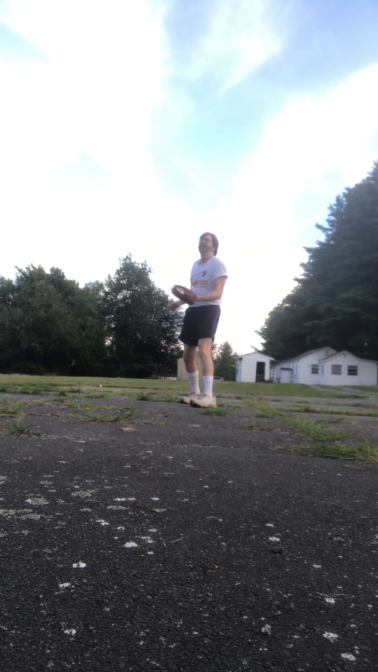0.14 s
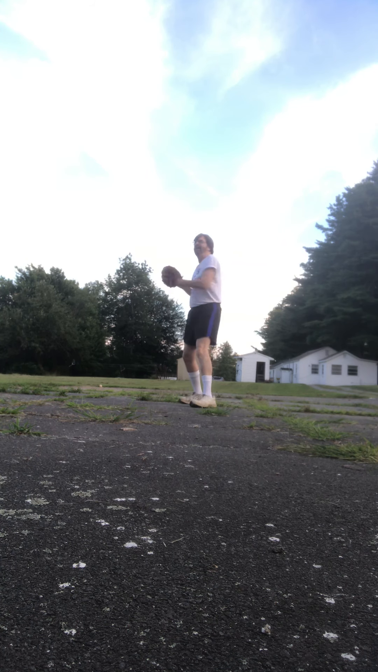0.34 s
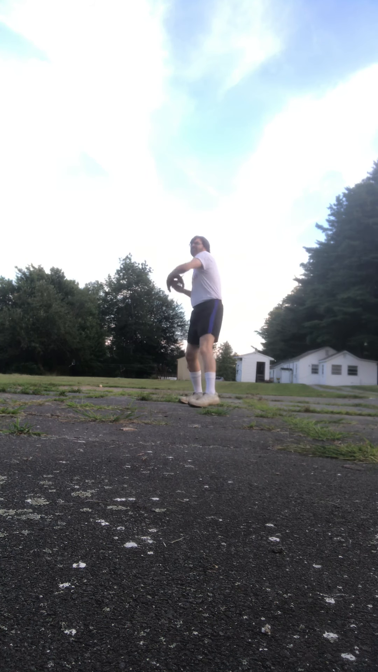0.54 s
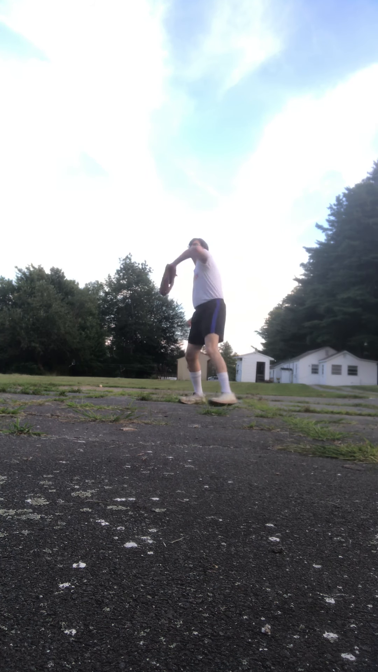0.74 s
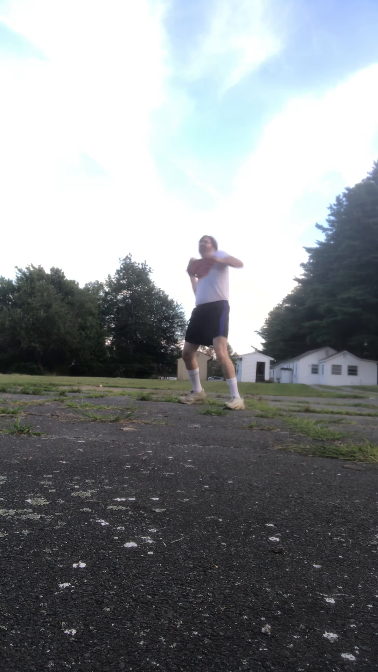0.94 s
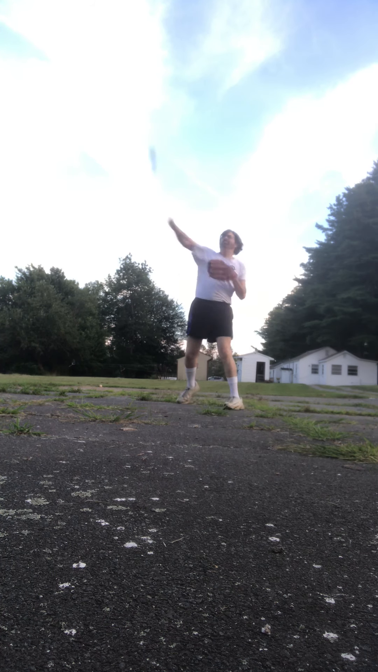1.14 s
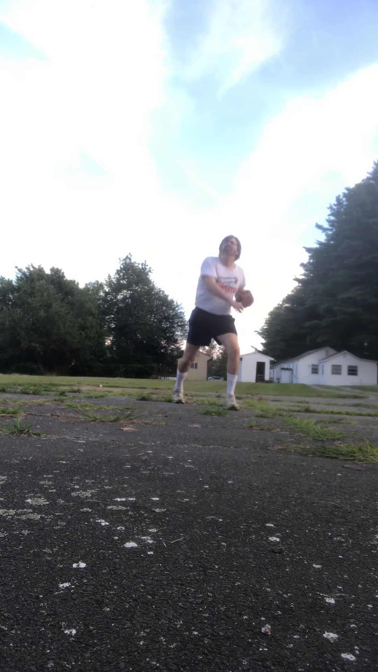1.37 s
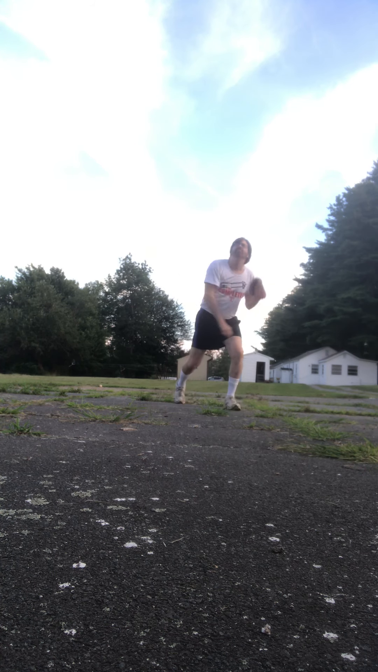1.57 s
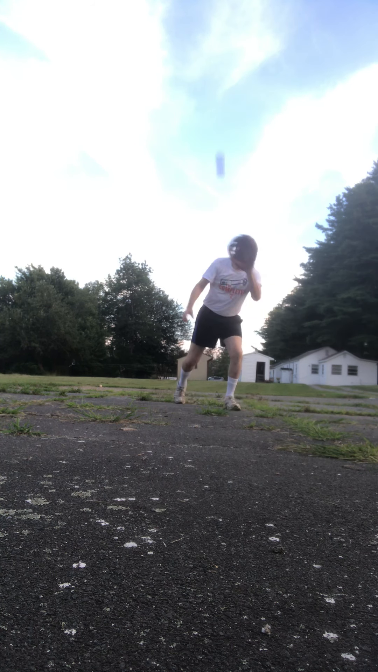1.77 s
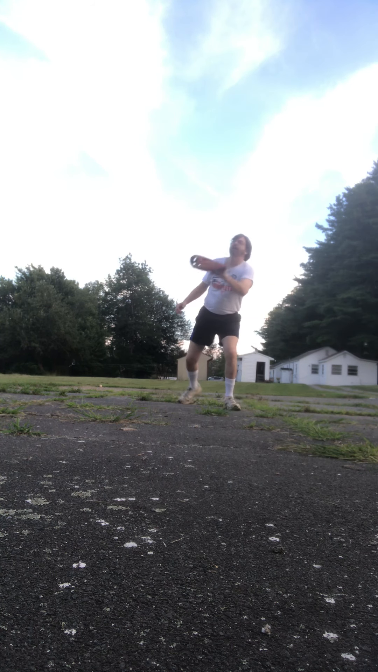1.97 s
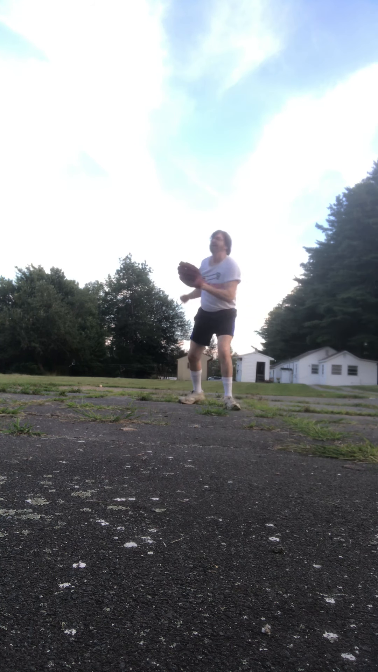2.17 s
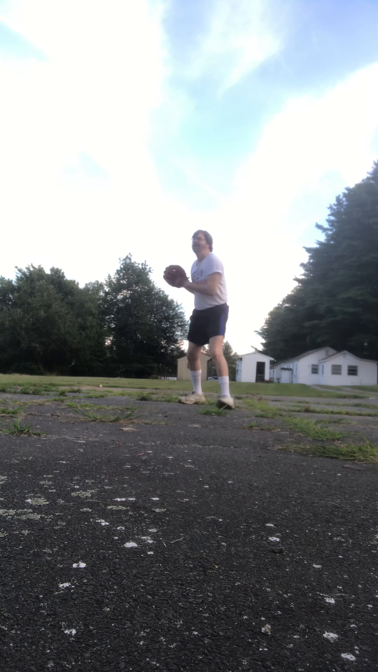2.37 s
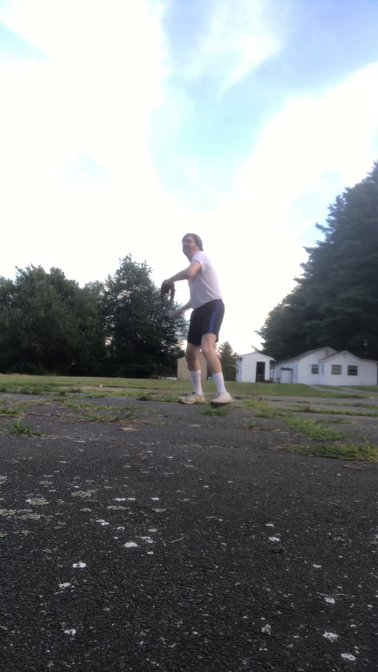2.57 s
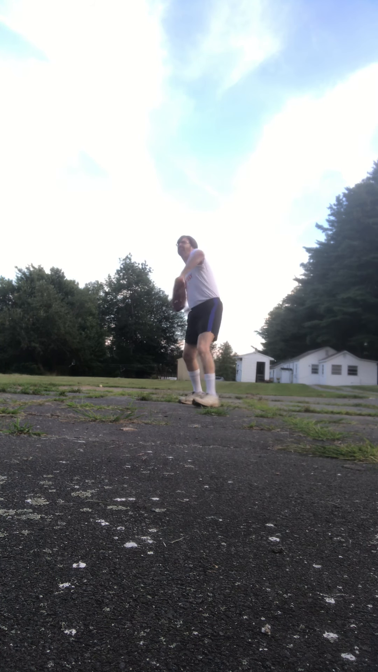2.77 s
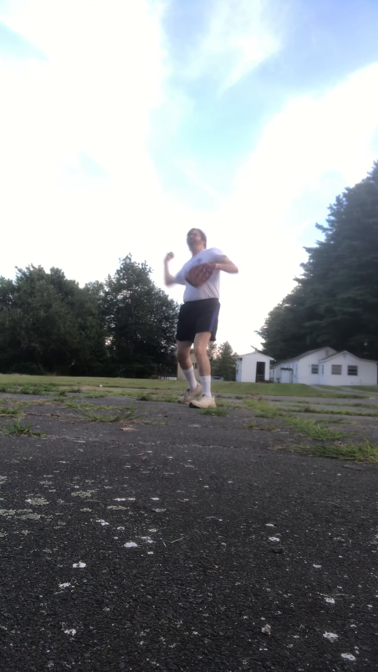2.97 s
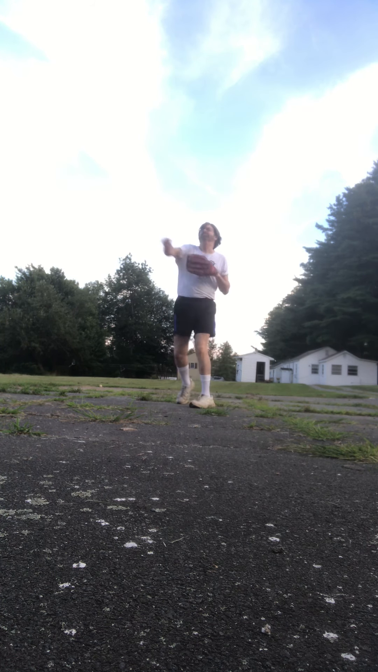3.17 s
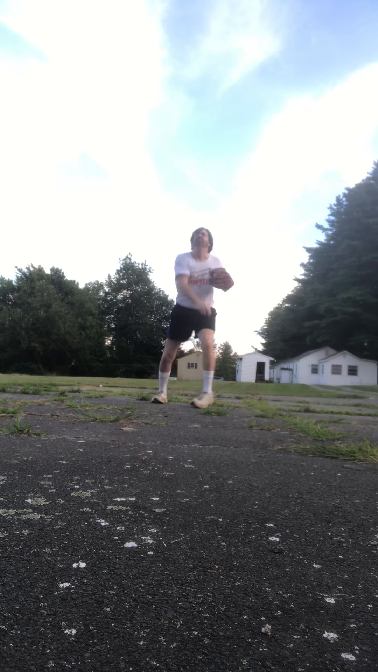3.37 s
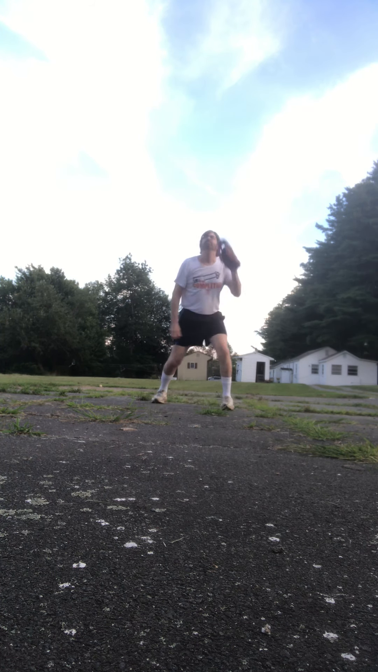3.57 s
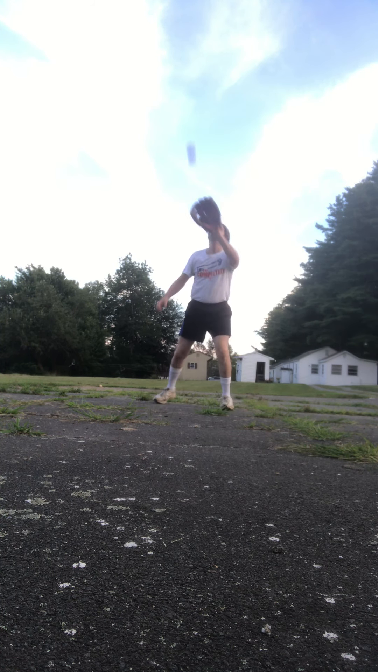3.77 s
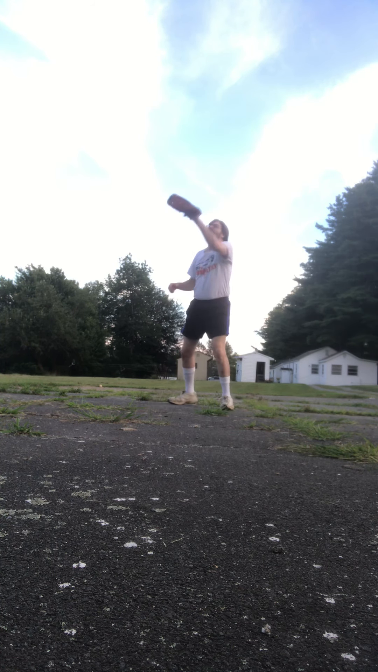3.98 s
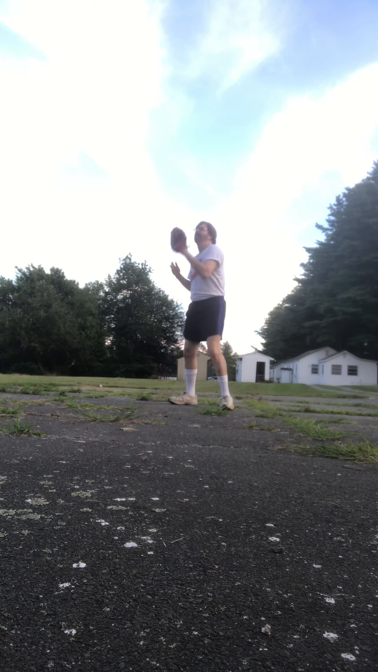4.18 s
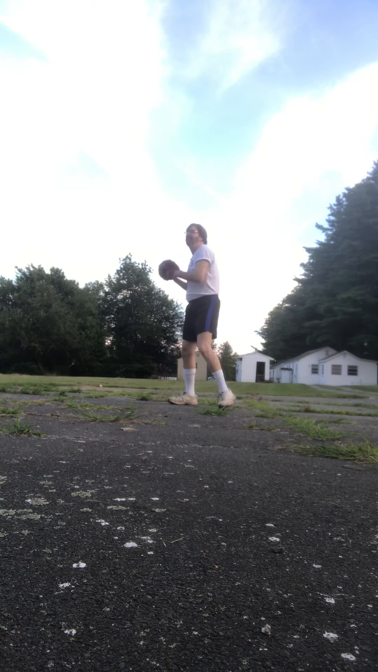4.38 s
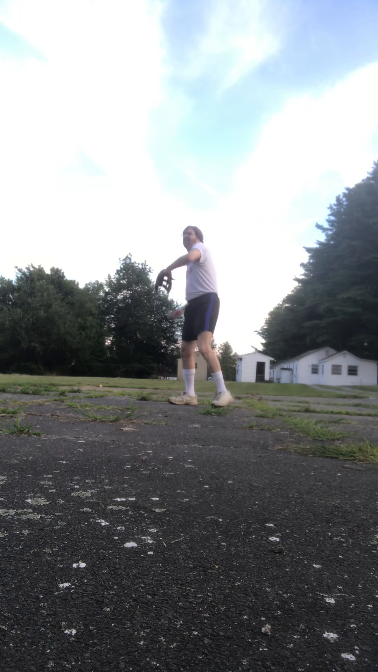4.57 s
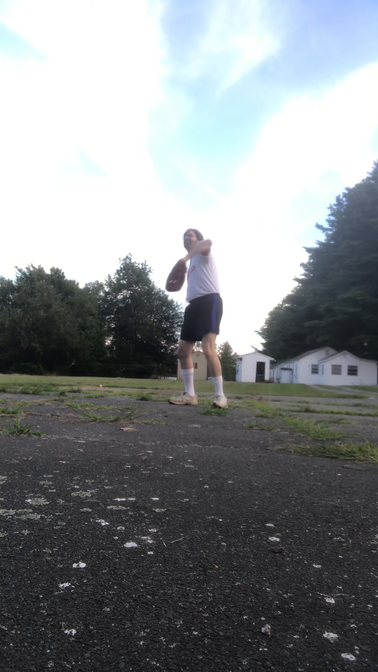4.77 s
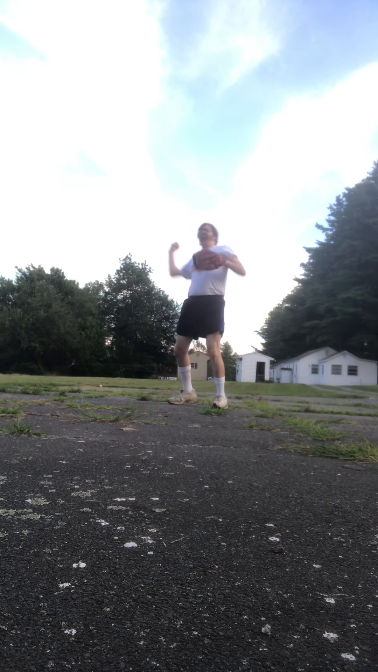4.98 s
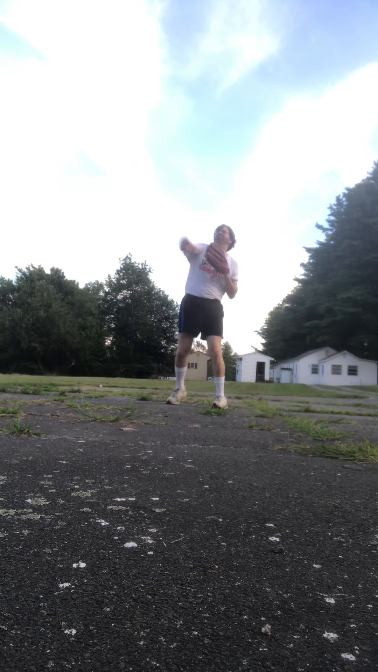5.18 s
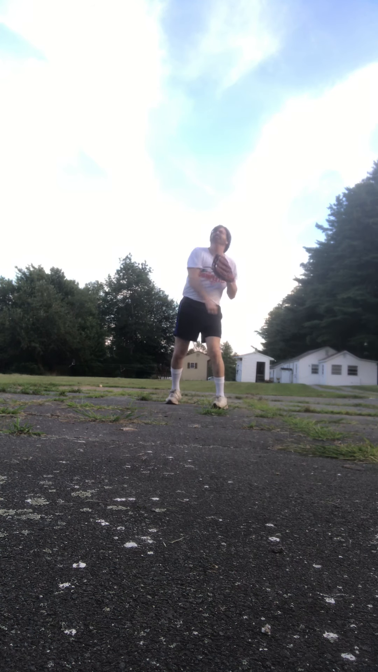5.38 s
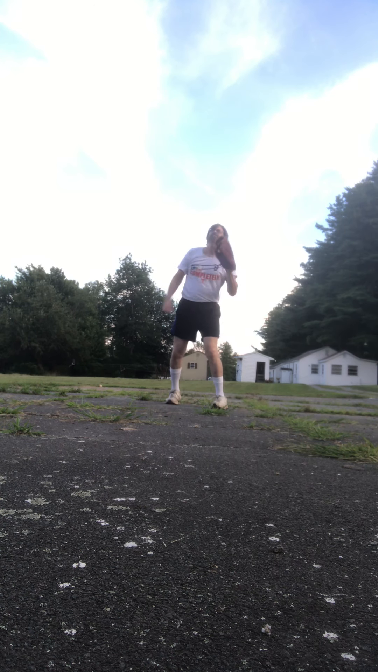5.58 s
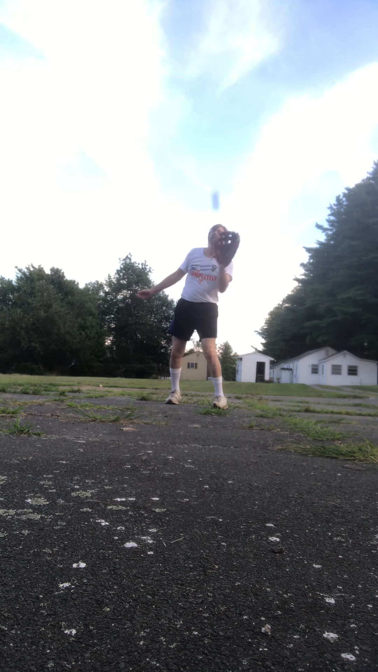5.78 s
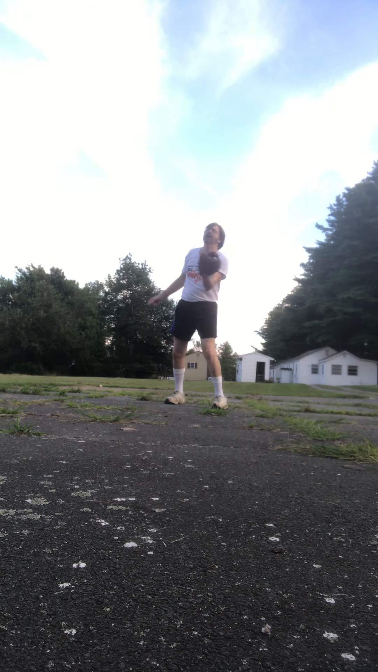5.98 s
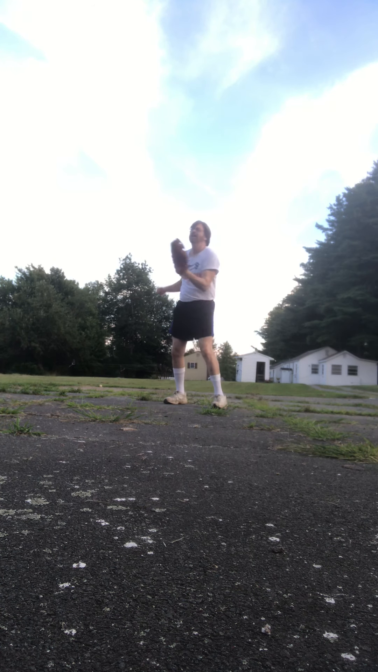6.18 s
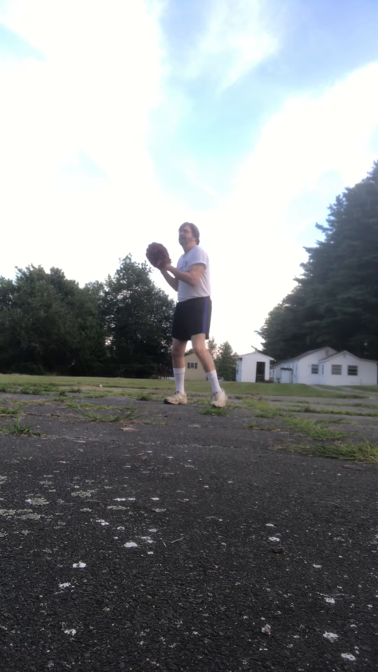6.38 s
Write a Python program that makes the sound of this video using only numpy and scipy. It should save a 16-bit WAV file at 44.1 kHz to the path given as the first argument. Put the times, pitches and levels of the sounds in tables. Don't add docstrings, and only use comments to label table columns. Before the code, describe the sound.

A quiet open asphalt yard with faint distant traffic hum, a thin cricket and tiny bird chips. Three times, about two seconds apart, a ball hits a hollow panel close to the microphone: a sharp, choked crack with a low boom and faint echoes from sheds and trees. Half a second later a lighter leather smack marks each catch. Shoes scuff and crunch grit between throws.

```python
import sys
import numpy as np
from scipy import signal
from scipy.io import wavfile

SR = 44100
rng = np.random.default_rng(int(sys.argv[2]) if len(sys.argv) > 2 else 0)


def unload_wav(signal):
    wavfile.write(
        sys.argv[1],
        SR,
        np.round(np.clip(np.atleast_2d(signal).T, -1, 1) * 32767).astype(np.int16),
    )


def voltage_ratio(decibels):
    exponent = np.asarray(decibels, float) / 20
    return 10 ** exponent


N = 283563


def rms_one(x):
    return x / np.sqrt(np.mean(x ** 2) + 1e-20)


def peak_one(x):
    return x / np.max(np.abs(x))


def band(x, lo_hz, hi_hz):
    edges = [max(lo_hz, 10), min(hi_hz, .45 * SR)]
    return signal.sosfilt(signal.butter(2, edges, "band", fs=SR, output="sos"), x)


def resonance(x, hz, width_hz):
    r = np.exp(-np.pi * width_hz / SR)
    return signal.lfilter([(1 - r * r) / 2, 0, (r * r - 1) / 2],
                          [1, -2 * r * np.cos(2 * np.pi * hz / SR), r * r], x)


def body(force, peaks):
    return sum((-1) ** k * voltage_ratio(db) * resonance(force, hz, width) for k, (hz, width, db) in enumerate(peaks))


def fade(t60, seconds):
    return voltage_ratio(-60 * np.arange(int(seconds * SR)) / SR / max(t60, 1e-4))


def add(track, s, sound):
    i = max(round(s * SR), 0)
    track[i:i + len(sound)] += sound[:N - i]


def drift(rate):
    r = np.exp(-80 * np.pi * rate / SR)
    slow = signal.lfilter([1], [1, -2 * r, r * r], rng.standard_normal(N // 40 + 2002))[2000:]
    return np.interp(np.arange(N) / 40, np.arange(len(slow)), rms_one(slow))


def rush(peaks, db, seconds, top_hz, slope=0.95):
    swell = np.linspace(0, 1, int(seconds * SR)) ** slope
    hiss = body(rng.standard_normal(len(swell)), peaks)
    hiss = band(band(hiss, 360, top_hz), 200, 2.1 * top_hz)
    return voltage_ratio(db) * swell * rms_one(hiss)


# pitch_hz [Hz], level_db [dB per Hz]
AIR_SPECTRUM = [(90, -8), (130, -11), (250, -15.5), (500, -23), (1200, -24.5), (2000, -31), (2800, -35.5),
                (4000, -38.5), (7000, -40.5), (9000, -46.5), (10500, -49.5), (12500, -46.5), (15500, -54)]
# pitch_hz [Hz], width_hz [Hz], level_db [dB rms]
HUMS = [
    (33.97, 19.5, -69.5),
    (56.55, 9, -53.5),
    (71, 21, -53),
    (145.5, 7.9, -57.5),
    (349.6, 14, -67.5),
    (5554, 600, -72),
]


def yard():
    white = rng.standard_normal((2, N + SR))
    edges = 90 * 2 ** np.arange(0, 7.7, 1 / 3)
    hz, db = np.transpose(AIR_SPECTRUM)
    air, together = 0, drift(0.5)
    for k, (low, high) in enumerate(zip(edges, edges[1:])):
        level_db = np.interp(np.log(low * high) / 2, np.log(hz), db)
        gain = voltage_ratio(level_db + .8 * together + .9 * drift(8))
        air = air + gain * band(white[k % 2], low, high)[SR:]
    out = voltage_ratio(-57.5) * air / np.std(band(air, 190.0, 16000))
    motor_hz = 347.7 + 1.46 * drift(4.53)
    out += voltage_ratio(-61 + 0.46 * drift(2.3)) * np.sin(2 * np.pi * np.cumsum(motor_hz) / SR)
    for hz, width, db in HUMS:
        noise = rng.standard_normal(N + SR)
        hum = resonance(resonance(noise, hz, width), hz, 1.4 * width)
        out += voltage_ratio(db) * rms_one(hum[SR:])
    return out


# start_s [s], level_db [peak dB], pitch_hz [Hz]
BIRD_CHIPS = [(0.159, -53, 5120), (0.765, -55, 5240), (0.9926, -65, 4760), (1.643, -60, 5010),
              (2.07, -61, 4800), (2.4244, -56.5, 5080), (2.532, -65, 4580), (3.639, -60, 4900),
              (3.765, -60, 4800), (4.563, -59, 5150), (4.6844, -69, 4500), (5.128, -63, 5020)]


def birds():
    out, u = np.zeros(N), np.linspace(0, 1, int(.018 * SR))
    for s, db, hz in BIRD_CHIPS:
        pitch = hz * (.92 + .1 * np.sin(np.pi * u))
        add(out, s, voltage_ratio(db) * np.hanning(len(u)) * np.sin(2 * np.pi * np.cumsum(pitch) / SR))
    return out


CRICKET_STARTS = [0, .39, .81, 1.27, 1.715, 2.172, 2.6, 3.025, 3.57, 4.1, 4.59, 5.0, 5.425, 5.87, 6.29]


def cricket():
    out, u = np.zeros(N), np.linspace(0, 1, int(.12 * SR))
    pitch = 8000 * (.955 + .065 * np.sin(np.pi * u) ** .6 - .025 * u)
    for s in CRICKET_STARTS:
        throb = rms_one(band(rng.standard_normal(len(u)), 10, 105)) + 1.1
        add(out, s, voltage_ratio(-79) * np.hanning(len(u)) ** 0.28 * throb * np.sin(2 * np.pi * np.cumsum(pitch) / SR))
    return out


# start_s [s], length_s [s], level_db [dB], low_db and high_db [dB re middle range]
SCUFFS = [(0.164, 0.092, -67.5, 4, -3), (0.22, 0.1, -66, -6, -8), (0.483, 0.053, -66, -9, -31),
          (0.84, 0.054, -65.5, 11.5, -3), (1.056, 0.12, -69.5, 13.5, -2), (1.266, 0.25, -60.5, 0.5, -14.5),
          (1.278, 0.1, -65.5, 6.5, -16), (1.375, 0.076, -57, 8, -5), (2.286, 0.064, -57.5, 5.5, -14),
          (2.322, 0.12, -61.5, -6, -18), (2.326, 0.069, -57.5, -1.5, -14), (3.075, 0.084, -56.5, 10, 2.5),
          (3.189, 0.058, -56.5, 2.5, -4), (3.221, 0.047, -54, -23, -6.5), (3.304, 0.087, -53.5, 5, -9),
          (3.328, 0.042, -51, 8, -14), (3.412, 0.033, -48, -3, 3), (3.483, 0.07, -55.5, 7.5, -22),
          (3.933, 0.09, -59, 1.5, -12), (4.162, 0.091, -65.5, 6.5, -28), (4.488, 0.068, -61.5, 15, 0),
          (4.568, 0.1, -62.5, 6, -1.5), (5.954, 0.086, -65, -9, -26)]


def scuffs():
    attack_s, release_s = 0.017, 0.027
    grains = rng.standard_normal(N) * voltage_ratio(2 * rng.exponential(1, N))
    grains *= (rng.random(N) < 9000 / SR) * voltage_ratio(1.5 * drift(80))
    low, mid, high = (rms_one(band(grains, *edges)) for edges in [(350, 1500), (1500, 5000), (5000, 8200)])
    high = high + voltage_ratio(-5.0) * rms_one(band(grains, 8500, 17000))
    out, grip = np.zeros(N), voltage_ratio(1.5 * drift(30))
    for s, length, db, low_db, high_db in SCUFFS:
        i = np.arange(round(s * SR), round((s + length) * SR))
        t = i / SR - s
        shape = np.clip(np.minimum(t / attack_s, (length - t) / release_s), 0, 1) ** 2
        grit = mid[i] - voltage_ratio(low_db) * low[i] - voltage_ratio(high_db) * high[i]
        out[i] += voltage_ratio(db) * shape * rms_one(grip[i]) * grit
    return out


# start_s [s], level_db [peak dB], low_db, middle_db, high_db [dB of each ring]
CRUSHED_STONES = [(1.075, -32, -12, -16, -14), (1.303, -31, -12, -11, -18), (1.337, -34, -22, -13, -8),
                  (3.088, -34, -14, -10, -13), (3.117, -30, -20, -23, -5), (3.123, -30, -4, -18, -15),
                  (3.204, -42, -12, -15, -11), (3.328, -33, -10, -11, -19), (3.344, -28.5, -15, -9, -22),
                  (3.348, -23, -19, -0.5, -20), (3.353, -38, 8, 5, -12), (3.986, -33, -20, -7, -9),
                  (3.982, -34, -9.5, -12, -22), (4.057, -38, -18, -4, -20), (4.298, -35, -18, -5.5, -16),
                  (4.017, -33, -20, -5, -14), (4.166, -36, -13, -5, -23), (4.183, -35, -8, -5, -21),
                  (4.192, -31.5, -20, -7, -20), (4.212, -34, -9, -6.5, -30),
                  (4.482, -24.5, -11.5, -12, -10), (4.497, -35, -3, -19, -25), (4.504, -32, -3, -11, -15),
                  (4.513, -26.5, -7, -5.5, -10), (4.521, -28.5, -13, -8, -10), (4.526, -28, -15, -10, -5),
                  (4.534, -25.5, -5.5, -11, -13), (4.546, -39, -9, -8, -13), (4.581, -41, -9, -5, -9),
                  (4.592, -41, -19, -5, -15), (4.597, -45, -12, -10, -13), (4.605, -32, -11, -7, -17),
                  (4.611, -28, -22, -9, -10), (4.62, -29, -29, -7, -6), (4.633, -38, -25, -6, -11),
                  (4.649, -38, -25, -4, -20)]
# pitch_hz [Hz], width_hz [Hz]
SOLE_RINGS = [
    (1050, 280),
    (2400, 720),
    (6200, 1700),
]


def crunch():
    out, n = np.zeros(N), SR // 30
    for s, db, *ring_db in CRUSHED_STONES:
        burst = rng.standard_normal(n) * fade(0.0089, 1)[:n]
        rings = sum(voltage_ratio(g) * peak_one(resonance(resonance(burst, hz, w), hz, 2 * w))
                    for g, (hz, w) in zip(ring_db, SOLE_RINGS))
        add(out, s, voltage_ratio(db - 4.5) * rings)
    return out


# start_s [s], level_db [peak dB], pitch_hz [Hz],
# t60_s [s]
KNOCKS = [(1.104, -32.5, 656, 0.011), (1.397, -35, 424, 0.031), (1.43, -30, 280, .06),
          (1.407, -37.5, 568, 0.054), (3.388, -27, 633, 0.027), (5.385, -32, 760, 0.024),
          (2.849, -40.5, 231, 0.03), (1.926, -23.5, 374, 0.015), (2.087, -45.5, 386, 0.037),
          (3.097, -36, 605, 0.021), (3.109, -33.5, 870, 0.021), (3.119, -36, 560, 0.021),
          (4.518, -43, 666, 0.029), (3.129, -38.5, 835, 0.021), (3.343, -38.5, 249, 0.079),
          (3.498, -17, 452, 0.01), (3.603, -41.5, 195, 0.084), (3.917, -28.5, 202, 0.02),
          (5.899, -33, 680, 0.02)]


def knocks():
    out, t = np.zeros(N), np.arange(SR // 20) / SR
    for s, db, hz, t60 in KNOCKS:
        onset = 1 - np.exp(-t / 0.0014)
        add(out, s, voltage_ratio(db + 6.5) * onset * np.sin(2 * np.pi * hz * t) * fade(t60, .05))
    return out


# start_s [s], level_db [peak dB], pitch_hz [Hz], scratch_db [dB]
LEATHER_TICKS = [(0.187, -53, 1750, -21), (0.247, -49, 1290, -19), (0.299, -46, 1210, -29),
                 (1.1454, -46, 1570, -16.5), (1.315, -40.5, 2250, -18), (1.9263, -36.5, 1660, -13),
                 (1.9038, -35, 7450, -30), (1.918, -41, 3300, -25), (5.883, -38, 2200, -25),
                 (2.3086, -36.5, 1250, -13.5), (2.377, -52, 1800, -2), (2.582, -48, 1300, -11),
                 (2.891, -50.5, 1310, -8.5), (3.9145, -41, 1800, -14), (3.899, -33, 1300, -16),
                 (3.893, -36, 1800, -18), (4.3313, -60, 1808, -2), (5.662, -53, 1070, -12),
                 (5.98, -55, 1210, -18), (5.995, -54, 1900, -21), (5.077, -43, 1260, -38),
                 (5.1494, -58, 1450, 1), (5.259, -51.5, 4700, -11), (5.948, -51, 1525, -8),
                 (5.971, -47, 1850, -30), (6.167, -46.5, 1315, -37), (3.499, -34, 1540, -26)]
# start_s [s], level_db [peak dB], pitch_hz [Hz], scratch_db [dB]
LACE_TICKS = [(0.4888, -50, 2320, -23), (1.276, -43, 1450, -18), (2.8374, -32.5, 2080, -29),
              (3.279, -37.5, 1240, -21), (3.5224, -34.5, 2900, -44), (3.966, -43.5, 2250, -19),
              (4.058, -46, 1730, -14.5), (4.301, -48.5, 1647, -38), (4.84, -44, 1480, -27),
              (4.212, -48, 2350, -36), (5.979, -55, 1260, -32), (6.01, -54, 1650, -36)]
# start_s [s], level_db [peak dB], pitch_hz [Hz], scratch_db [dB]
STONE_TICKS = [(2.009, -53, 1270, -20), (2.2937, -42.5, 3320, -20), (2.366, -42, 5100, 1),
               (2.6289, -45, 1600, -9.5), (3.3138, -43, 1290, -11), (0.187, -52, 3000, -10),
               (0.2275, -56, 8500, -15), (0.248, -50, 4200, -12), (0.2985, -49, 4000, -12),
               (0.4965, -53, 4000, -20), (0.502, -49, 3600, -14), (0.51, -54, 3300, -14),
               (1.077, -52, 3000, -8), (1.0825, -54, 2500, -12), (1.384, -46, 6200, -8),
               (1.393, -45, 6000, -10), (3.107, -42, 7500, -8), (3.1445, -50, 11000, -20),
               (3.242, -43, 4700, -20), (3.329, -41, 3600, -18), (4.018, -47, 4500, -14)]
# t60_s [s], edge_db [dB of the bright edge]
TICK_KINDS = [
    (0.0068, -16),
    (0.026, -26),
    (0.0055, -8),
]


def ticks():
    out, n = np.zeros(N), SR // 20
    t = np.arange(n) / SR
    for rows, (t60, edge_db) in zip((LEATHER_TICKS, LACE_TICKS, STONE_TICKS), TICK_KINDS):
        for s, db, hz, scratch_db in rows:
            scratch = rng.standard_normal(n) * (1 - np.exp(-t / 0.00011)) * fade(t60, .05)
            scratch[12] += 3.0
            underside = peak_one(band(scratch, 530, 0.5 * hz))
            add(out, s, voltage_ratio(db - 12.5) * underside)
            tone = peak_one(resonance(resonance(scratch, hz, 0.26 * hz), hz, 1.34 * hz))
            tone += voltage_ratio(scratch_db + 11.5) * peak_one(band(scratch, 2500, 7000))
            edge = voltage_ratio(edge_db + 3.0) * peak_one(band(scratch, 7000, 14000))
            add(out, s - .0005, voltage_ratio(db + 3.0) * (tone + edge))
    return out


# start_s [s], level_db [peak dB], thump_delay_s [s], thump_db [dB], tail_db [dB]
CATCHES = [
    (1.8957, -16, 0.0022, 1, -12),
    (3.8703, -10.5, 0.0027, -4, -13),
    (5.8706, -9.5, 0.00268, 0.5, -20.5),
]
# pitch_hz [Hz], width_hz [Hz], level_db [dB]
WEB = [
    [(1620, 51, -13), (2240, 57, -2), (3380, 210, -10), (4400, 210, -11), (5020, 310, -11.5),
     (7070, 100, -14), (11700, 77, -38)],
    [(1460, 660, -1), (2550, 210, 1.5), (4090, 78, -2.5), (4580, 210, -21), (6100, 120, -16.5),
     (9600, 200, -17), (11700, 82, -16.5)],
    [(2200, 124, 8), (3320, 100, 2), (4600, 120, -8), (5120, 200, -6), (7280, 290, -8), (10900, 340, -11),
     (13200, 260, -15)],
]
# pitch_hz [Hz], width_hz [Hz], level_db [dB]
POCKET = [
    [(107, 70, -23), (249, 39, -23), (495, 110, -11), (975, 134, -6.5)],
    [(110, 218, -11), (270, 120, -12), (600, 230, 4), (1240, 180, 8)],
    [(132, 17, -36), (334, 310, 8.5), (662, 120, 7), (1750, 280, -9)],
]
# delay_s [s], level_db [dB]
FINGERS = [
    [(0, -14), (.0008, 2), (.0017, -3.5), (.0036, -10), (.0062, -16)],
    [(0, -16), (.0005, 2.5), (.0013, -3), (.0033, -3), (.0046, -14)],
    [(.0003, -17.5), (.00075, -3), (.0012, 6), (.0021, -12), (.0042, -5)],
]
# pitch_hz [Hz], width_hz [Hz], level_db [dB]
WEB_RUSH = [
    [(2030, 300, -20), (3010, 140, 2)],
    [(1900, 330, 2), (2900, 360, 4)],
    [(2040, 300, -7.5), (2940, 150, 7)],
]
SNAP_DB = [-13, -12.5, -15]


def glove():
    out, n = np.zeros(N), SR // 5
    t = np.arange(n) / SR
    for catch, web, pocket, fingers, hiss, snap_db in zip(CATCHES, WEB, POCKET, FINGERS, WEB_RUSH, SNAP_DB):
        s, db, thump_delay, thump_db, tail_db = catch
        add(out, s - .017, rush(hiss, db - 27, 0.031, 4200, slope=0.78))

        contacts = rng.standard_normal(n) * (1 - np.exp(-t / 0.00015)) * np.exp(-(t / 0.0039) ** 4)
        contacts *= 0.08
        for delay, finger_db in fingers:
            add(contacts, delay, voltage_ratio(finger_db) * np.hanning(5))
        damped = [(hz, width + 0.032 * hz, g) for hz, width, g in web]
        slap = peak_one(body(contacts, damped))
        snap = peak_one(band(contacts * fade(0.06, .2), 3100, 22000))
        add(out, s, voltage_ratio(db + 5.0) * (slap + voltage_ratio(snap_db) * snap))

        squeeze = np.hanning(int(thump_delay * SR) + 2)
        bottom = -2.5 * np.hanning(int(0.0015 * SR) + 2)
        force = np.concatenate([squeeze, bottom, np.zeros(n)]) + 1e-18
        thump = peak_one(sum(voltage_ratio(g) * resonance(force, hz, w) for hz, w, g in pocket))
        add(out, s, -voltage_ratio(db + 5.5 + thump_db) * thump)

        rustle = band(rng.standard_normal(n), 100, 1700)
        rustle += 0.17 * band(band(rng.standard_normal(n), 1500, 5500), 1200, 7600)
        add(out, s, voltage_ratio(db + tail_db + 4.5) * rustle * fade(0.13, .2))
    return out


# start_s [s], level_db [peak dB], knock_lead_s [s], knock_hz [Hz], knock_db [dB]
WALL_HITS = [
    (1.4235, -3, 0.005, 626, -10.5),
    (3.3983, -3.5, 0.0058, 837, -10),
    (5.3932, -2, 0.00513, 732, -11.5),
]
# delay_s [s], level_db [dB], smear_s [s]
FAR_ECHOES = [
    (0.271, -37.5, 0.012),
    (0.2886, -29, 0.000095),
    (0.3526, -35, 0.0011),
    (0.373, -38, 0.002),
    (.391, -48, .001),
    (.3, -37.5, 0.06),
    (.355, -34, 0.21),
]
# pitch_hz [Hz], width_hz [Hz], level_db [dB]
FAR_COLOUR = [(943, 320, 1.5), (1663, 230, 6.5), (2450, 72, -1), (3000, 450, -2.5), (4320, 1500, -13.5)]


def far_echoes():
    out = np.zeros(N)
    for s, db, *_ in WALL_HITS:
        for delay, echo_db, smear in FAR_ECHOES:
            scatter = rng.standard_normal(SR // 3) * fade(18.0 * smear, 1 / 3)
            scatter[0] = 12.0
            scatter = scatter / np.sqrt(np.sum(scatter ** 2))
            add(out, s + delay, voltage_ratio(db + echo_db + 23.0) * band(body(scatter, FAR_COLOUR), 460, 7500))
    return out


# delay_s [s], level_db [dB], pitch_hz [Hz], width_hz [Hz], smear_s [s]
NEAR_ECHOES = [(.002, -12, 2585, 2950, 0.00061), (0.014, -33, 8500, 4940, 0.001),
               (.016, -20.5, 3180, 1790, 0.00082), (0.0197, -30, 4200, 2500, 0.0026),
               (0.0227, -22.5, 1335, 400, 0.00049), (0.0209, -25.5, 3200, 904, .0006),
               (.033, -32.5, 1995, 500, .0008), (.059, -44.5, 5500, 7000, .0004),
               (.064, -42, 3200, 900, 0.00046), (.067, -44, 3600, 1500, .0004),
               (0.07, -43, 3280, 900, 0.0003), (0.083, -38.5, 2970, 1400, 0.00091),
               (0.0832, -48.5, 8500, 2500, 0.00045), (.098, -47, 3400, 1500, 0.0013)]
RETURN_DB = [0.1, -4.5, -1.3]


def near_echoes():
    out = np.zeros(N)
    for (s, db, *_), return_db in zip(WALL_HITS, RETURN_DB):
        for delay, echo_db, hz, width, smear in NEAR_ECHOES:
            scatter = rng.standard_normal(SR // 5) * fade(10.0 * smear, .2)
            scatter[0] = 4.0
            echo = resonance(resonance(scatter, hz, width), hz, 2 * width)
            add(out, s + delay, voltage_ratio(db + echo_db + return_db * (delay > .03)) * peak_one(echo))
    return out


def panel_rattle():
    out, n = np.zeros(N), SR // 5
    for s, db, *_ in WALL_HITS:
        rattle = rng.standard_normal(n) * voltage_ratio(2.5 * np.minimum(rng.exponential(1, n), 4) - 3.5)
        add(out, s, voltage_ratio(db - 28) * band(rattle, 280, 4000) * fade(0.2, .2))
        add(out, s, voltage_ratio(db - 12.0) * band(rng.standard_normal(n), 160, 850) * fade(0.16, .2))
    return out


# pitch_hz [Hz], level_db [dB], t60_s [s]
HOLLOW_MODES = [
    (82.7, -12.5, 0.63),
    (119.8, 4, 0.24),
    (145.8, 0.5, 0.33),
    (148.6, -9, 0.71),
    (155.1, 0, 0.29),
    (225, -14, 0.3),
    (387, -9.5, 0.076),
]
# delay_s [s], level_db [dB]
BOOM_RETURN = (0.02145, -5.5)


def hollow_boom():
    out, t = np.zeros(N), np.arange(SR) / SR
    return_s, return_db = BOOM_RETURN
    swell = 1 - np.exp(-t / 0.0024)
    for s, *_ in WALL_HITS:
        for hz, mode_db, t60 in HOLLOW_MODES:
            boom = voltage_ratio(mode_db - 23.5) * swell * fade(t60, 1) * np.sin(2 * np.pi * hz * t + 1.5)
            boom = band(boom, 45, 4000)
            add(out, s, boom)
            add(out, s + return_s, voltage_ratio(return_db) * boom)
    return out


# pitch_hz [Hz], width_hz [Hz], level_db [dB]
PANEL = [
    [(580, 119, 4.5), (1480, 460, -1.5), (1913, 90, 8.5), (2460, 200, -1.5), (3874, 800, -5.5),
     (5050, 570, -11), (6160, 360, -14.5), (9730, 170, -22), (11930, 230, -43.5), (13830, 510, -45)],
    [(710, 110, 11), (1265, 51, 7.5), (1730, 65, 8), (2690, 1300, -4.5), (4580, 320, -0.5), (5240, 260, -2),
     (5940, 990, -1.5), (8130, 150, -56.5), (9300, 710, -10.5), (11400, 470, -22)],
    [(656, 42, -3), (1334, 350, -3.5), (1840, 86, 9), (2430, 1000, -9.5), (4480, 490, -4.5),
     (5020, 230, -28.5), (6210, 300, -12), (9410, 280, -26), (11200, 199, -44.5), (13400, 210, -42.5)],
]
RING_S = [.0041, .0041, .0040]


def panel_crack():
    out, t = np.zeros(N), np.arange(SR) / SR
    click = (t == 0) + 1e-18
    touch = peak_one(band(click, 7000, 16000))
    for (s, db, lead, knock_hz, knock_db), peaks, ring in zip(WALL_HITS, PANEL, RING_S):
        add(out, s - .02, rush(peaks, db - 31.0, 0.048, 2600))
        choke = np.exp(-(t / ring) ** 4) + .05 * fade(0.03, 1)
        crack = peak_one(body(click, peaks) * choke)
        add(out, s, voltage_ratio(db + 3.0) * crack + voltage_ratio(db - 19.5) * touch)
        u = t / lead
        knock = np.sin(2 * np.pi * knock_hz * t * (1.3 - .35 * u))
        knock *= (u * 1.4 * np.exp(1 - u * 1.84)) ** 2 * (t < 2 * lead)
        add(out, s - lead, voltage_ratio(db + knock_db) * knock)
    return out


def scene():
    background = yard() + birds() + cricket()
    player = scuffs() + crunch() + knocks() + ticks() + glove()
    wall = far_echoes() + near_echoes() + panel_rattle() + hollow_boom() + panel_crack()
    return (background + player + wall)[None]


def low_pass(x):
    return signal.sosfilt(signal.butter(12, 16830, fs=SR, output="sos"), x)


def record(dry):
    dry = signal.sosfilt(signal.butter(2, 35, "high", fs=SR, output="sos"), dry)
    rounded = 1.11 * np.tanh(dry / 1.12)
    top = signal.cheby2(12, 70, 17250, fs=SR, output="sos")
    mix = signal.sosfilt(top, rounded)
    return low_pass(mix)


dry = scene()
out = record(dry)
unload_wav(out)
```